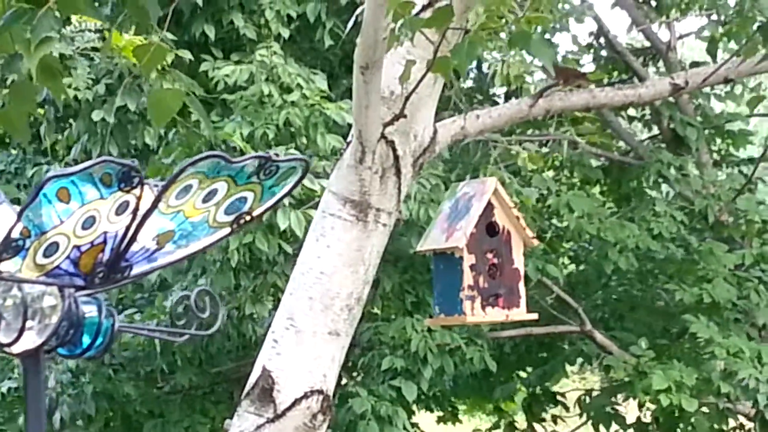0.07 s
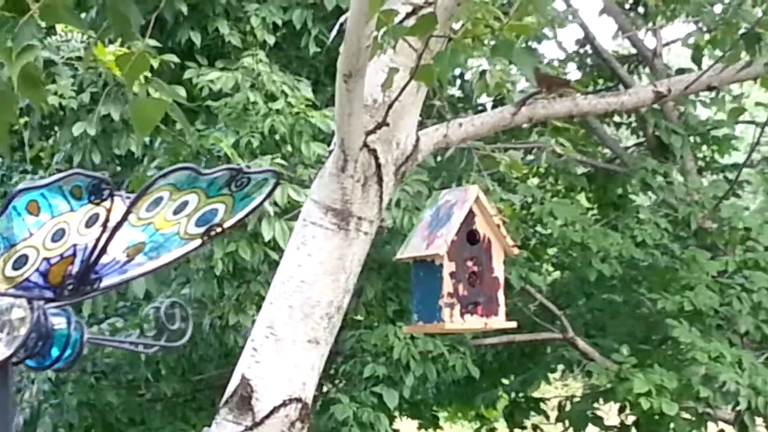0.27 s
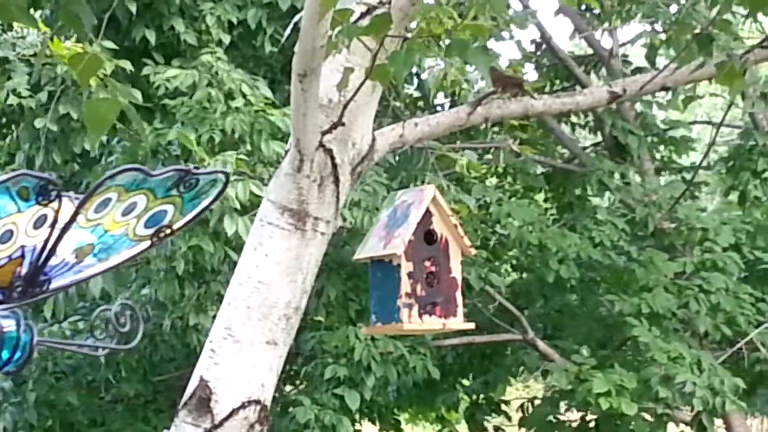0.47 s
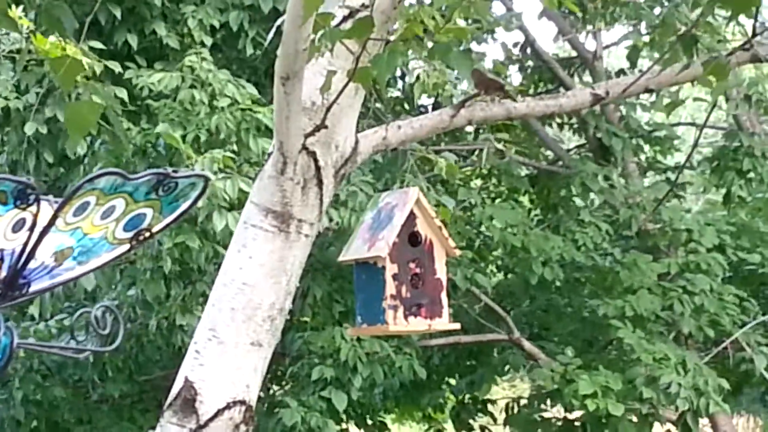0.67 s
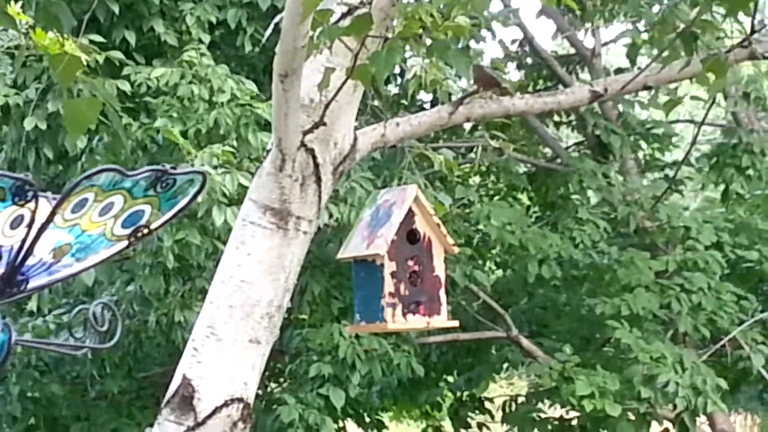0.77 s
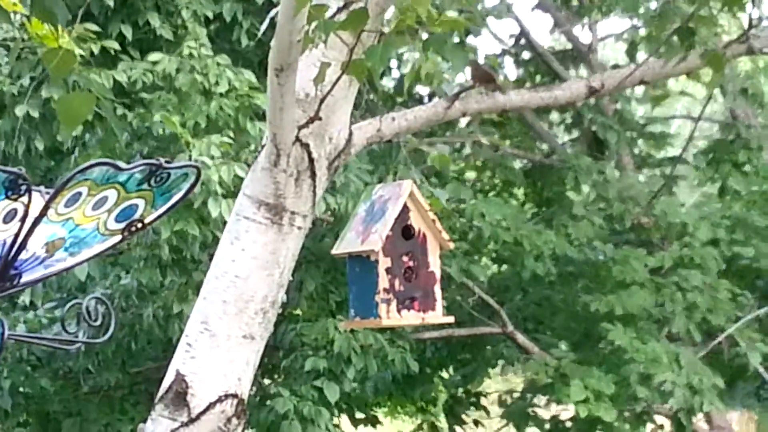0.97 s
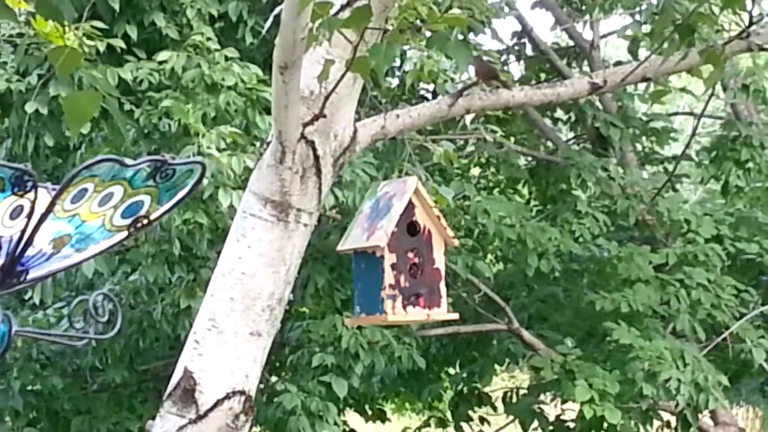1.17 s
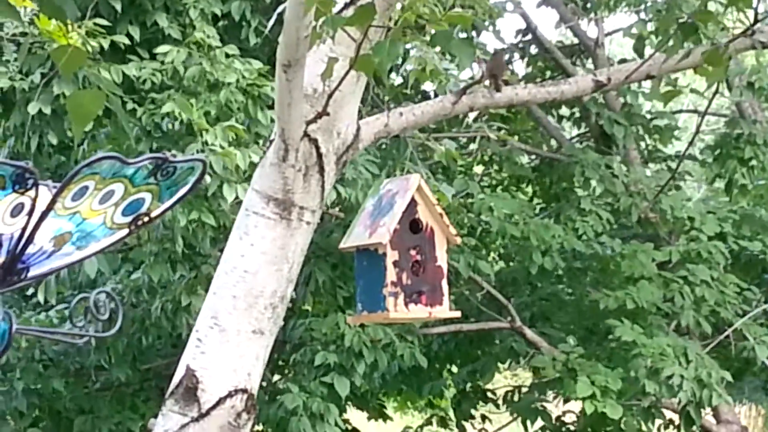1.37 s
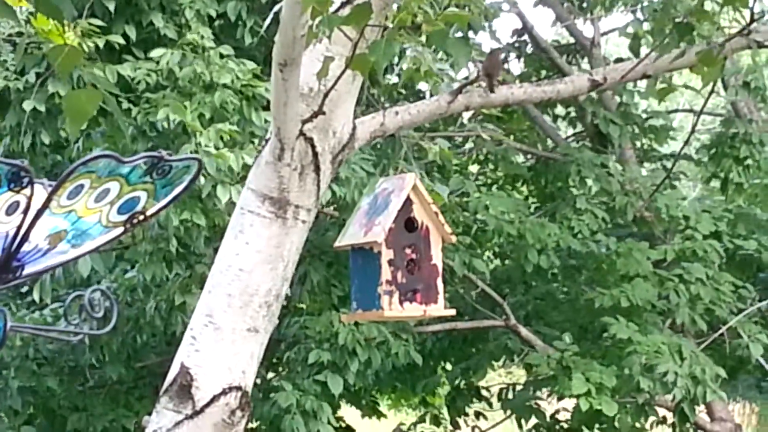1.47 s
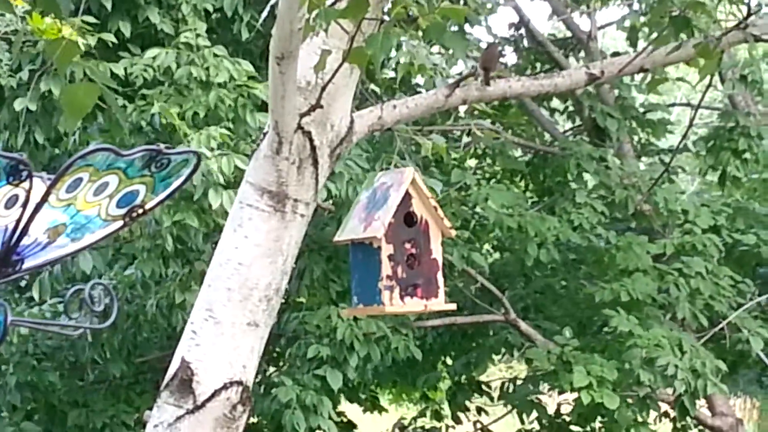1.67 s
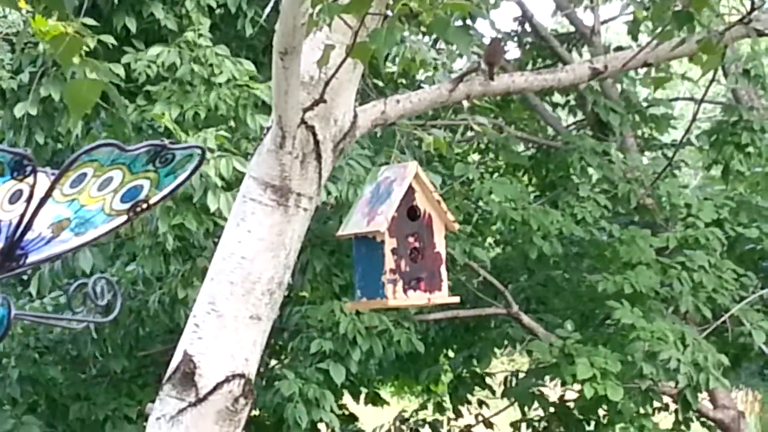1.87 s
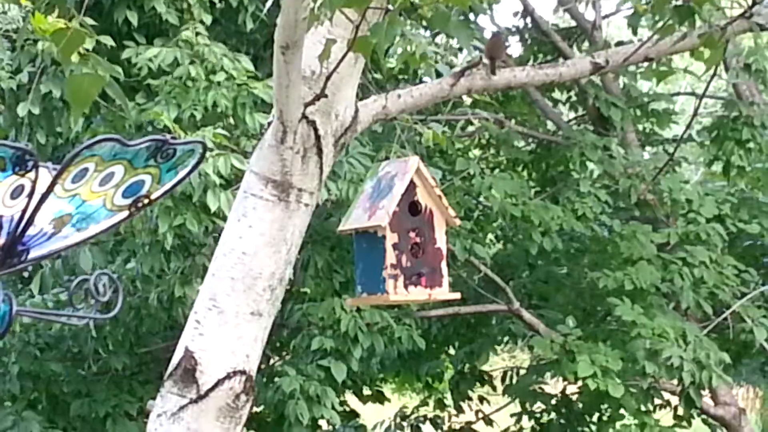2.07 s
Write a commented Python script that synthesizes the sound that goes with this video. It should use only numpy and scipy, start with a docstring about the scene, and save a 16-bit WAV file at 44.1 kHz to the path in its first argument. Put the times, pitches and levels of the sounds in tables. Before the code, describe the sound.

Close wren song: quick squeaks and sweeps, then three rapid two-note trills stepping down in pitch

```python
"""A quiet outdoor hush runs throughout, with faint distant calls near the start and end; over it a house wren
sings close to the stereo microphones in a leafy backyard: scratchy and nasal notes, high sweeps, then three
trills, each lower than the last and each alternating two syllables. Every bird note is a gliding tone.
Decaying noise forms the echoes from trunks and foliage; distant falling calls are heard only through them,
distant rising whistles both directly and through them. Filtered noise makes the hush, and short wavering
tones make soft bumps and far knocks."""
import sys
import numpy as np
from scipy import signal
from scipy.fft import rfft, irfft
from scipy.io import wavfile
from scipy.ndimage import uniform_filter1d

SR = 44100
rng = np.random.default_rng(int(sys.argv[2]) if len(sys.argv) > 2 else 0)


def store_wav(level_fs):
    """Save 16-bit WAV to argv[1]."""
    pcm = np.round(np.clip(np.atleast_2d(level_fs), -1, 1) * 32767)
    wavfile.write(sys.argv[1], SR, pcm.T.astype(np.int16))


N = 92610  # 2.1 s of samples


def from_db(db):
    """Convert decibels to an amplitude gain."""
    return 10 ** (np.asarray(db) / 20)


def at_hz(points, hz):
    """Interpolate a table of (frequency, value) along a log-frequency axis."""
    table_hz, values = np.transpose(points)
    return np.interp(np.log(np.maximum(hz, 1)), np.log(table_hz), values)


def drift(n, rate):
    """Wander between random values within +-1.6, with `rate` new values per second."""
    values = rng.uniform(-1.6, 1.6, 400)
    return np.interp(np.arange(n) * rate / SR, np.arange(400), values)


def add(out, start, sound):
    """Mix a sound into `out` at `start` seconds."""
    i = int(np.clip(start * SR, 0, N - 1))
    out[..., i:i + sound.shape[-1]] += sound[..., :N - i]


# Spectrum shape of the yard's air, before its overall level is set: (frequency [Hz], level per Hz [dB])
HUSH_SPECTRUM = [(30, -23.5), (60, -5.5), (130, -1), (1000, -5), (1500, -10), (4500, -13.5), (14000, -23)]
HUSH_DB = -50         # RMS level re full scale [dB]
HUSH_LIKENESS = 0.19  # expected correlation between left and right microphones


def hush():
    """Steady outdoor air: shaped noise, partly alike at both microphones."""
    hz = np.arange(N // 2 + 1) * SR / N
    spectrum = rfft(rng.standard_normal((2, N))) * from_db(at_hz(HUSH_SPECTRUM, hz))
    mid, side = irfft(spectrum, N)
    shared = np.sqrt(1 + HUSH_LIKENESS) * mid
    air = shared + np.sqrt(1 - HUSH_LIKENESS) * np.array([side, -side])
    return from_db(HUSH_DB) * air / air.std()


# Soft low bumps and faint far knocks: (time of peak [s], pitch [Hz], level [dB])
KNOCK_EVENTS = [(.58, 82.4, -53.5), (0.667, 145.5, -45), (1.55, 1020, -40), (1.687, 1093, -40)]
KNOCK_CYCLES = 2.6  # from the peak to 1/e of its level [cycles]


def knocks():
    """Dull bumps and knocks: a few uneven cycles under a bell-shaped envelope."""
    out = np.zeros(N)
    for time, hz, db in KNOCK_EVENTS:
        cycles = (np.arange(N) / SR - time) * hz
        # The phase wander starts 0.1 s before the peak
        wander = np.roll(drift(N, hz / KNOCK_CYCLES), int(time * SR) - SR // 10)
        envelope = np.exp(-(cycles / KNOCK_CYCLES) ** 2)
        out += from_db(db) * envelope * np.sin(2 * np.pi * cycles + 2 * wander)
    return out


# Echoes from nearby branches, the foliage, one hard surface and the wider yard, before band-pass and balance:
# (delay [s], build-up time constant [s], time to fall 60 dB [s], level [dB])
ECHO_PATHS = [(0.0017, 0.00034, 0.057, -1.5), (0.0093, 0.009, 0.13, -4.5), (0.019, 0.00028, 0.045, -19.5),
              (0.027, 0.018, 0.43, -13)]
SCATTER_LEFT_DB, SCATTER_BAND_HZ = 4.5, (1470, 9400)  # left minus right [dB]; band edges [Hz]


def foliage(sound, paths):
    """Dense echoes, different at each microphone, build up and die away; leaves return little bass or top."""
    t = np.arange(SR) / SR
    response = np.zeros((2, SR))
    for delay, build, t60, db in paths:
        age = np.maximum(t - delay, 0)
        shape = (1 - np.exp(-age / build)) * from_db(-60 * age / t60)
        shape = shape / np.linalg.norm(shape)
        response += from_db(db) * shape * rng.standard_normal((2, SR))
    band = signal.butter(1, SCATTER_BAND_HZ, "band", fs=SR, output="sos")
    response = signal.sosfilt(band, response)
    balance = from_db(np.array([[.5], [-.5]]) * SCATTER_LEFT_DB)
    return balance * signal.fftconvolve(sound[None], response, axes=1)[:, :N]


WOBBLE, ROUGH_WOBBLE = 0.0068, .024   # scale of pitch drift [share of the pitch]
WOBBLE_PER_S, FLUTTER_DB = 364, 3     # drift values per second; scale of level drift [dB]


def gesture(rows, wobble, size=70):
    """Smoothed, slightly unsteady pitch and loudness of one note; `size` is the fade in samples."""
    time, hz, db = np.transpose(rows)
    n = max(int((time[-1] - time[0]) * SR), 2 * size)
    t = time[0] + np.arange(n) / SR
    smooth_pitch = uniform_filter1d(np.interp(t, time, hz), size)
    pitch = smooth_pitch * (1 + wobble * drift(n, WOBBLE_PER_S))
    k = np.arange(n)
    to_nearest_end = np.minimum(k, k[::-1])
    fade = np.sin(np.pi / 2 * np.minimum(to_nearest_end / size, 1)) ** 2
    level_db = np.interp(t, time, db) + FLUTTER_DB * drift(n, WOBBLE_PER_S)
    return pitch, fade * from_db(level_db)


# Strength of a whistle's overtones: (overtone frequency [Hz], level relative to the fundamental [dB])
OVERTONE_LEVELS = [(8000, -38), (10500, -65), (13500, -35.5)]


def whistle(pitch):
    """An almost pure tone with two faint overtones, at twice and three times its pitch."""
    phase = 2 * np.pi * np.cumsum(pitch) / SR
    tone = np.sin(phase)
    for k in (2, 3):
        tone += from_db(at_hz(OVERTONE_LEVELS, k * pitch)) * np.sin(k * phase)
    return tone


# Faint rising whistles farther off, before FAR_WET_DB lifts their echoes: lists of
# (time [s], pitch [Hz], level [dB])
FAR_RISING_NOTES = [
    [(0, 1633, -42), (.07, 2085, -44), (.12, 3340, -35)],
    [(.385, 1620, -43), (.448, 1824, -41.5), (.505, 2760, -40)],
    [(2.045, 6780, -66), (2.088, 7330, -45.5)],
]
FAR_WET_DB = 7.5  # lift of the rising whistles into the echoes [dB]
# Falling calls from behind the trees, before the echoes: lists of (time [s], pitch [Hz], level [dB])
FAR_FALLING_NOTES = [
    [(0, 4280, -28.5), (.025, 1980, -26)],
    [(1.82, 3040, -36.5), (1.885, 1825, -33.5)],
]


def far_birds():
    """Distant rising whistles trail echoes; falling calls reach the microphones only as a smear of echoes."""
    rises, falls = np.zeros((2, N))
    for out, notes in ((rises, FAR_RISING_NOTES), (falls, FAR_FALLING_NOTES)):
        for rows in notes:
            pitch, level = gesture(rows, ROUGH_WOBBLE)
            add(out, rows[0][0], level * whistle(pitch))
    into_trees = from_db(FAR_WET_DB) * rises + falls
    return rises + foliage(into_trees, ECHO_PATHS[1:])  # without the nearby branches


# Colour of the direct path at each microphone: (frequency [Hz], left level [dB], right level [dB])
DIRECT_COLOUR = [(2380, 1, 2), (3167, -12.5, 3.5), (3695, -2, -22.5), (4297, 8, -2.5), (5290, 5.5, -13.5),
                 (7100, -12.5, 3.5), (8150, 5, -4)]


def direct_path(sound):
    """The direct sound, coloured differently at each microphone."""
    hz = np.arange(N + 1) * SR / (2 * N)
    table = np.array(DIRECT_COLOUR)
    sides_db = [at_hz(table[:, [0, column]], hz) for column in (1, 2)]
    return irfft(rfft(sound, 2 * N) * from_db(sides_db))[:, :N]


# Syllable shapes by name, before the levels of SONG_ORDER: (time from start [s], pitch [Hz], level [dB])
SYLLABLES = { "squeak": [(0, 7600, -14), (.008, 5700, -8), (.016, 4200, -8)], "pip": [(0, 8600, -12),
             (.009, 7950, -10)], "chip": [(0, 4530, -2.5), (.015, 4550, -17), (.018, 3440, 7),
             (.027, 2770, -2)], "high fall": [(0, 5000, -38), (.014, 8300, -31.5), (.023, 6630, 2),
             (.032, 5750, 1.5), (.04, 4750, -16.5)], "dip": [(0, 4080, -18), (.004, 4500, -2.5),
             (.009, 3935, -15), (.014, 4740, -6), (.022, 6000, -5.5), (.036, 6570, -22)],
             "high slur": [(0, 7300, -31.5), (.011, 8110, -9), (.02, 6870, 4), (.033, 6460, -12)],
             "tick": [(0, 6100, -13), (.008, 4750, 0), (.015, 3950, -6)], "hook": [(0, 3750, -3),
             (.014, 3570, 0), (.019, 3250, -14), (.023, 3600, -9), (.041, 3700, -1)],
             "slur": [(0, 3124, -7), (.013, 3094, -1), (.026, 3000, -3.5), (.034, 2600, -8),
             (.043, 1820, -24)], "upsweep": [(0, 4520, -27), (.005, 4038, -8), (.019, 3250, -11),
             (.026, 4310, -6.5), (.031, 4395, -1.5), (.039, 5090, -7.5), (.0485, 6110, -6.5)],
             "arch": [(0, 1600, -20), (.006, 2100, -2), (.011, 2280, 0), (.016, 2080, -1),
             (.022, 1650, -20)], "zigzag": [(0, 3534, -36.5), (.004, 4518, -9), (.008, 3698, -0.5),
             (.0115, 4828, -9.5), (.016, 3760, 5.5), (.021, 3493, -1.5), (.026, 3060, 5),
             (.035, 2096, -22)], }
# Syllables with the less steady pitch: names
ROUGH_NAMES = ("squeak", "pip", "chip", "hook", "slur")
# Order of the song, after one faint tick at 0 s that begins the first distant falling call:
# (start time [s], syllable name, level added to its shape [dB])
SONG_ORDER = [ (0, "tick", -32), (0.092, "squeak", -22), (.105, "pip", -16.5), (0.138, "chip", -24.5),
              (0.31, "high fall", -13.5), (0.364, "dip", -7), (0.426, "high slur", -18),
              (0.4819, "tick", -12.5), (0.501, "hook", -17.5), (.546, "tick", -13.5), (.567, "hook", -15),
              (.611, "tick", -14), (.632, "hook", -17), (0.671, "slur", -14), (0.7342, "upsweep", -8.5),
              (0.816, "slur", -15.5), (.876, "upsweep", -7.5), (0.962, "slur", -17),
              (1.023, "upsweep", -8.5), (1.108, "slur", -15.5), (1.1706, "arch", -26.5),
              (1.213, "zigzag", -13.5), (1.2723, "arch", -24.5), (1.3138, "zigzag", -15),
              (1.373, "arch", -24.5), (1.414, "zigzag", -13), (1.477, "arch", -27.5),
              (1.5169, "zigzag", -15.5), (1.5768, "arch", -25.5), (1.6186, "zigzag", -15)]
BUZZ_HZ, BUZZ_DEPTH = 232, .5  # zigzag pulse rate [Hz] and depth [share of the level]


def whistled_syllables():
    """The far call's opening tick, then the wren's whistled syllables; the zigzag one pulses in level."""
    out = np.zeros(N)
    for start, name, db in SONG_ORDER:
        wobble = ROUGH_WOBBLE if name in ROUGH_NAMES else WOBBLE
        pitch, level = gesture(SYLLABLES[name], wobble)
        if name == "zigzag":
            t = np.arange(len(level)) / SR
            level = level * (1 - BUZZ_DEPTH * np.cos(2 * np.pi * BUZZ_HZ * t))
        add(out, start, from_db(db) * level * whistle(pitch))
    return out


# Nasal notes: (throat resonance [Hz], list of (time [s], pitch [Hz], level [dB]))
NASAL_NOTES = [(4044, [(.205, 952, -47), (.231, 1393, -23.5), (.241, 1483, -18.5), (.253, 1308, -39)]),
               (3370, [(.273, 1860, -22.5), (.282, 1479, -21), (.29, 1078, -35.5)])]
THROAT_WIDTH_HZ = 406  # offset from the resonance where a partial's gain is halved [Hz]


def nasal_notes():
    """The wren's nasal notes: five harmonics weighted by one throat resonance."""
    out = np.zeros(N)
    for throat_hz, rows in NASAL_NOTES:
        pitch, level = gesture(rows, WOBBLE)
        partials = np.arange(1, 6)[:, None] * pitch
        gains = 1 / (1 + ((partials - throat_hz) / THROAT_WIDTH_HZ) ** 2)
        phases = 2 * np.pi * np.cumsum(partials, axis=1) / SR
        tone = (gains * np.sin(phases)).sum(axis=0)
        add(out, rows[0][0], level * tone / np.linalg.norm(gains, axis=0))
    return out


def scene():
    """The air of the yard, soft knocks and far birds, with the wren close by, direct and scattered."""
    background = hush() + knocks() + far_birds()
    notes = whistled_syllables() + nasal_notes()
    return background + foliage(notes, ECHO_PATHS) + direct_path(notes)


def record(dry):
    """Clip any peak beyond full scale, then cut the top: 60 dB down from 15.6 kHz."""
    top_cut = signal.cheby2(16, 60, 15600, fs=SR, output="sos")
    return signal.sosfilt(top_cut, np.clip(dry, -1, 1))


dry = scene()
out = record(dry)
store_wav(out)
```